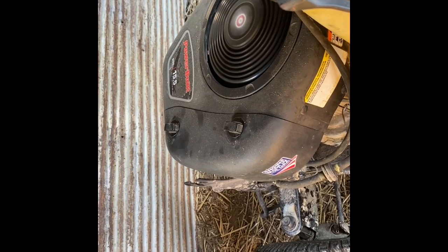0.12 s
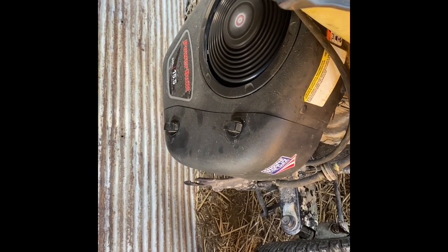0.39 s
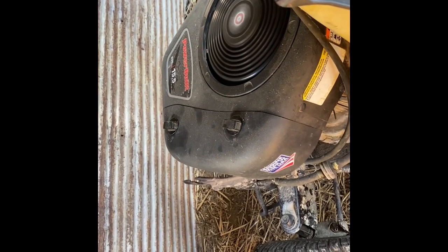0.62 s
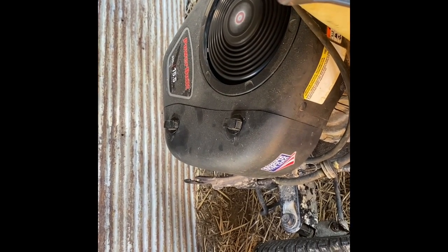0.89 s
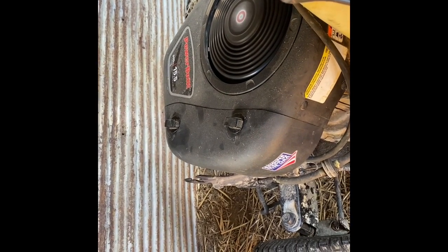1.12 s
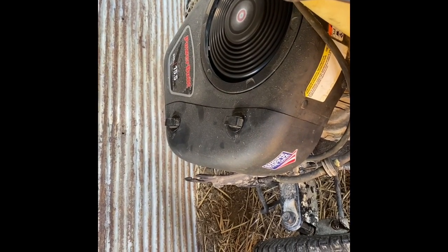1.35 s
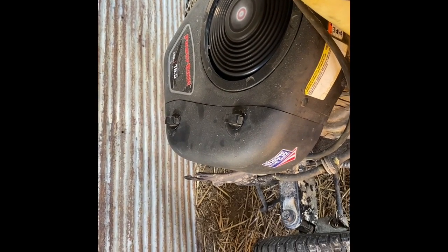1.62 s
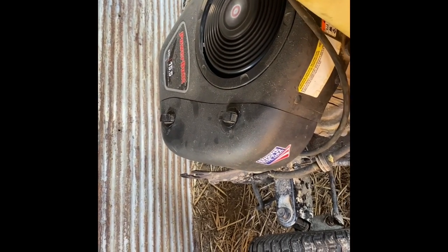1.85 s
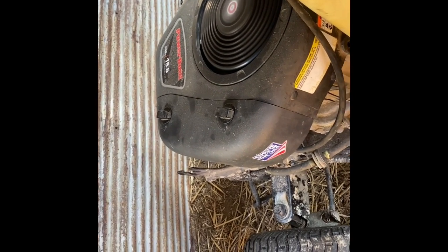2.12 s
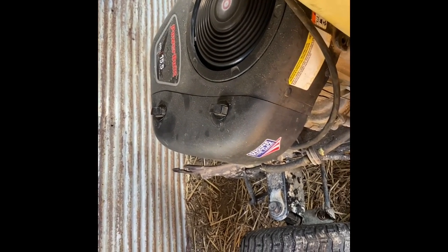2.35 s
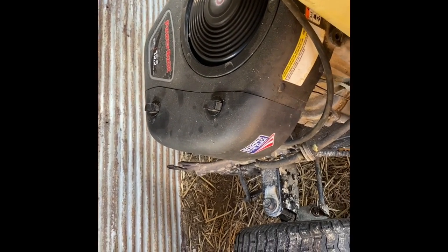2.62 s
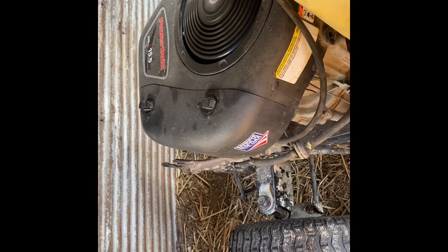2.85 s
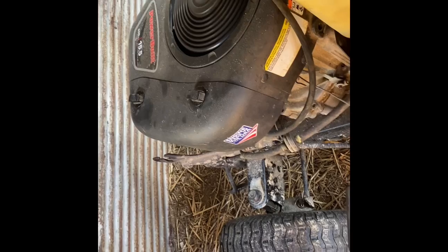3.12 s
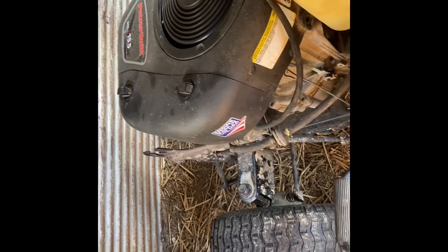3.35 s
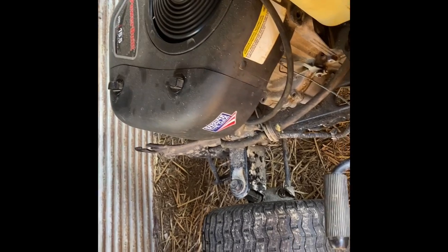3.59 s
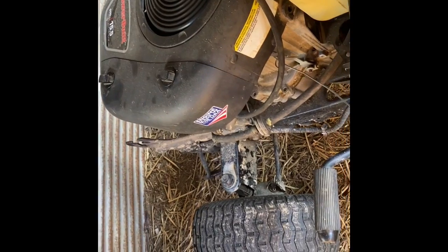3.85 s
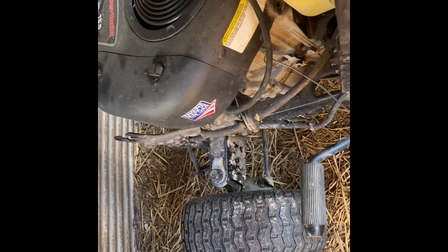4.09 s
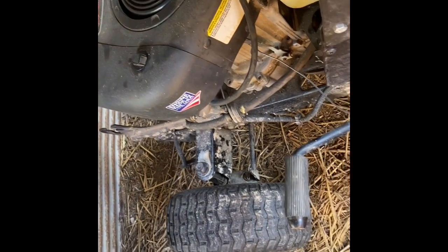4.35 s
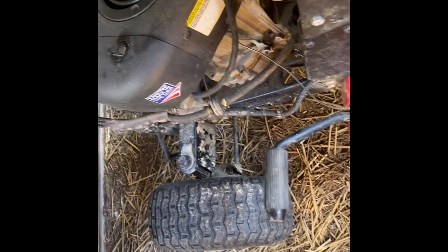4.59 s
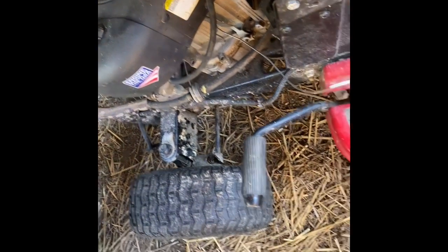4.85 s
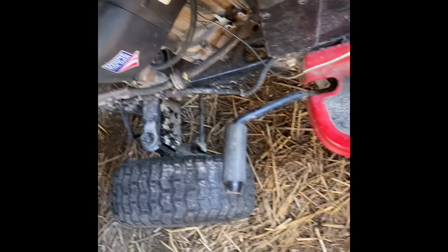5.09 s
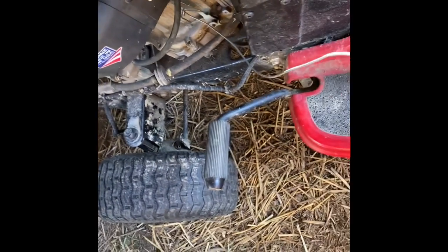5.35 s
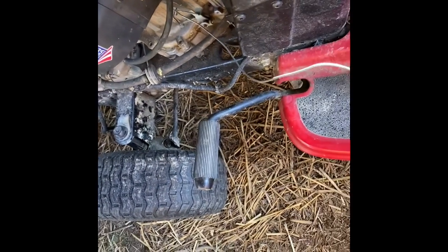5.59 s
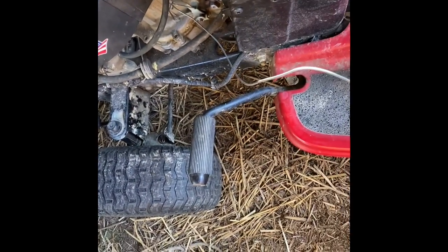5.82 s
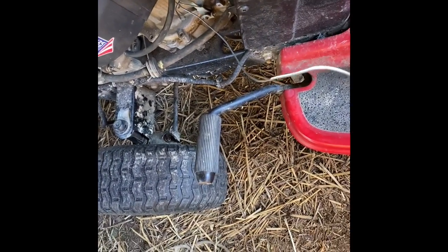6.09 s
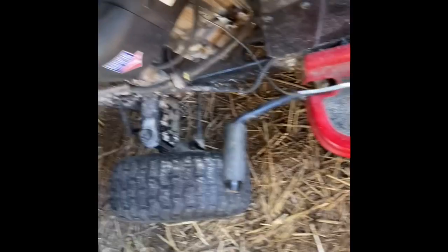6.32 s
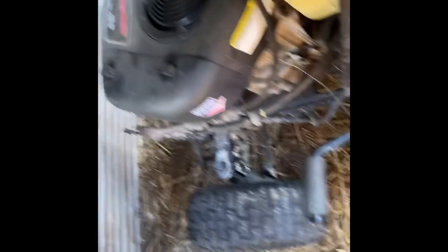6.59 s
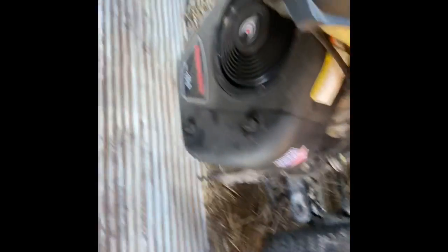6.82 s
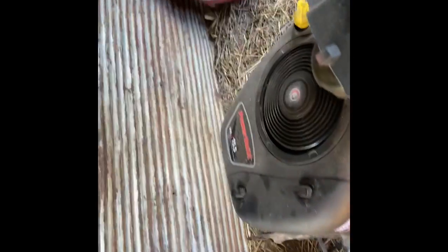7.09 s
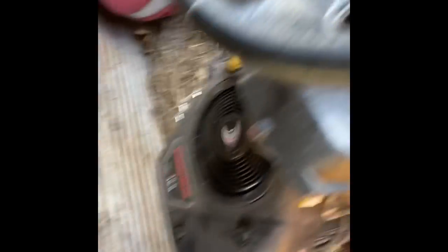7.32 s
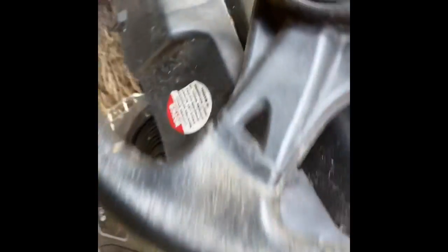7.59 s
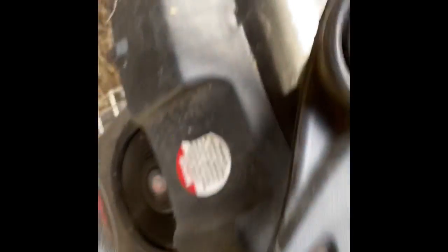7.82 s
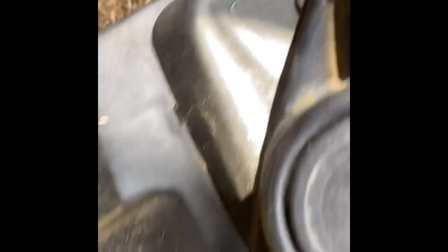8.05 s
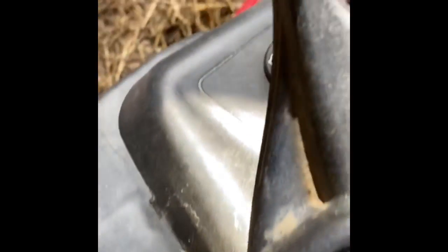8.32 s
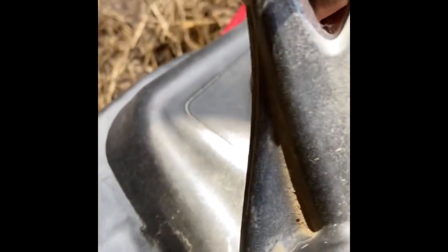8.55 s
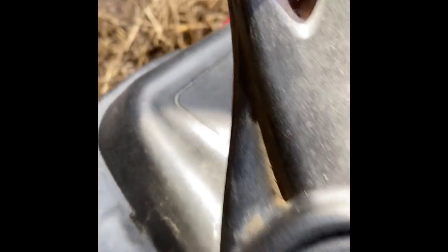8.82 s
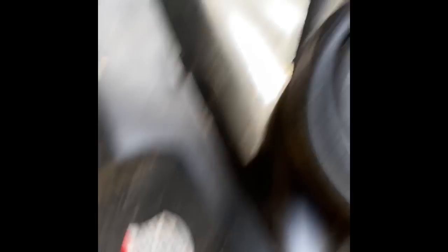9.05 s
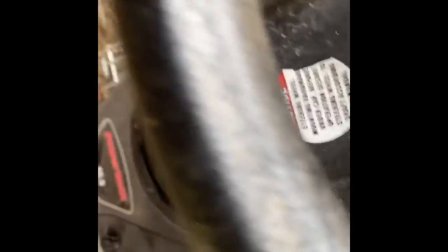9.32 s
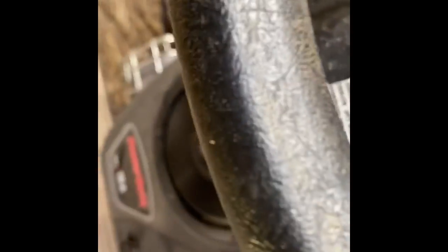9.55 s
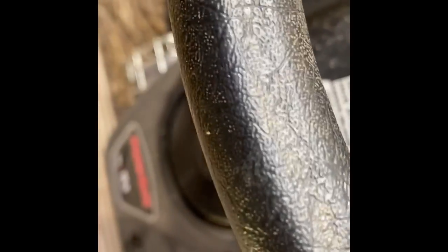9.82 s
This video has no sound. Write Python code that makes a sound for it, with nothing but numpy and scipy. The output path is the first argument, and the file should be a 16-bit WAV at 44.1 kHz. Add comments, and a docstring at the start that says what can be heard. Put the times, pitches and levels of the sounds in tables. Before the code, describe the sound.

Close up outdoors, a riding mower's petrol engine buzzes at speed, drops to a thudding, ticking idle, and finally cuts out with cracks and knocks.

```python
"""Beside a sheet-metal wall, a hand-held phone with two ports moves around a lawn tractor.
Its single-cylinder four-stroke engine runs fast, is throttled down to idle and switched off.
Each cycle rings pipe and muffler with a low thud and a sharp bang; two valve strokes tick and puff.
The casing rattles, the valve gear taps and the cooling fan rushes, all from filtered pulses and noise.
Under load, tones on the cycle rate drone; at the stop, cracks and a loose part's knocks are heard."""
import sys
import numpy as np
from scipy import signal
from scipy.fft import rfft, irfft, next_fast_len
from scipy.io import wavfile
from scipy.ndimage import uniform_filter1d

SR = 44100
rng = np.random.default_rng(int(sys.argv[2]) if len(sys.argv) > 2 else 0)


def boost(x):
    """Linear amplitude factor 10**(x/20) for a level x in decibels (scalar or array-like)."""
    u = np.asarray(x, float) / 20
    return 10 ** u


def generate_wav(sig):
    """Save sig (samples, or channels by samples) to the path in sys.argv[1] as 16-bit PCM at SR."""
    pcm = np.round(np.clip(np.atleast_2d(sig).T, -1, 1) * 32767).astype(np.int16)
    wavfile.write(sys.argv[1], SR, pcm)


N = 437913
T = np.arange(N) / SR  # time in s
FFT_SIZE = next_fast_len(N)
HZ = np.maximum(np.arange(FFT_SIZE // 2 + 1) * SR / FFT_SIZE, 1)  # frequency of each filter bin
MAX_CYCLES = 400  # more than the engine makes
IDLE_RATE = 14  # cycles per s
IGNITION_OFF_S = 9.185


def level(x, db):
    """Scale to an rms level."""
    return x * boost(db) / np.sqrt(np.mean(x ** 2))


def even(x):
    """Hold the power at 1 over a few cycles, whatever the speed."""
    power = uniform_filter1d(uniform_filter1d(x ** 2, size=8000), size=8000)
    return x / np.sqrt(power + 1e-12)


def follow(table):
    """Draw a two-column table out over time."""
    return np.interp(T, *np.transpose(table))


def shape(x, gain):
    """Filter by a complex gain given on HZ."""
    return irfft(rfft(x, FFT_SIZE) * gain, FFT_SIZE)[..., :N]


def ring(hz, width):
    """Response of one resonance, gain 1 at its centre."""
    return 1 / (1 + 1j * (HZ - hz ** 2 / HZ) / width)


def late(ms):
    """A pure delay."""
    return np.exp(-2j * np.pi * HZ * ms / 1000)


def colour(points):
    """Gain through (Hz, dB) points, straight on a log pitch scale."""
    hz, db = np.transpose(points)
    return boost(np.interp(np.log(HZ), np.log(hz), db, left=-60, right=db[-1] - 1.0))


def modes(push, table, column=0):
    """Ring delayed modes with the gains of one column, the sum darkened above 560 Hz."""
    gain = sum(row[3 + column] * late(row[2]) * ring(row[0], row[1]) for row in table)
    return shape(push, gain / (1 + (HZ / 560) ** 4))


def pulses(cycle, at, sizes):
    """One click each time the cycle passes the share `at`, split between two samples."""
    turn = np.arange(np.ceil(cycle[0] - at), cycle[-1] - at)
    place = np.interp(turn + at, cycle, np.arange(N - 0.))
    i, out = place.astype(int), np.zeros(N + 1)
    out[i] += sizes[:len(i)] * (1 - place + i)
    out[i + 1] += sizes[:len(i)] * (place - i)
    return out[:N]


def walk(rate):
    """Random levels held 1 / rate s and slewed twice."""
    hold = int(SR / rate)
    steps = np.repeat(rng.standard_normal(N // 200), hold)[:N]
    return uniform_filter1d(uniform_filter1d(steps, hold), hold)


def steadied(draws):
    """Per-cycle chance, bounded, and narrower over the cycles at working speed."""
    return np.clip(draws, -2, 2) * np.interp(np.arange(MAX_CYCLES), [46, 64], [.4, 1])


# engine speed, one cycle every two shaft turns: start_s, rate [cycles per s]
SPEED = [(0.0, 21.99), (0.43, 24.129), (0.65, 24.606), (1.22, 23.811), (1.86, 24.186), (2.14, 21.513),
         (2.3, 20.813), (2.96, 16.428), (3.9, 14.546), (4.9, 13.87), (5.42, 14.007), (5.76, 13.55),
         (6.15, 14.136), (6.6, 13.845), (8.45, 14.149), (9.1, 13.73), (9.93, 6.459)]


def engine_cycle():
    """Count the engine's cycles by summing its speed."""
    return -.04 + np.cumsum(follow(SPEED)) / SR


def pace(cycle):
    """Speed as a multiple of idle."""
    return np.gradient(cycle) * SR / IDLE_RATE


def load(cycle):
    """0 at idle or with the throttle shut, 1 under power at working speed."""
    shut_s, travel_s = 2.016, 0.13
    throttle = np.clip((shut_s - T) / travel_s + .5, 0, 1)
    return np.clip((pace(cycle) - 1.1) / .55, 0, 1) * throttle


# the phone moves nearer and further: start_s, level_db [on thud, bang, casing, blowdown and gas]
NEARNESS = [(0, 1.5), (0.6, 1.5), (1.3, 0), (2.2, 0.1), (2.6, -1.5), (3.0, -2), (3.5, 0.5), (4.2, -0.43),
            (6.5, 1.5), (7.5, 1.55), (9.1, 2.5)]


def loudness(cycle, law):
    """A layer's level in dB from speed, spark and the phone's distance."""
    idle_db, powered_db, step_db, coasting_db = law
    spark_fade_s = 0.11
    off = np.clip((T - IGNITION_OFF_S) / spark_fade_s + .5, 0, 1)
    doublings = np.log2(pace(cycle))
    powered = (1 - off) * powered_db * doublings
    coasting = off * (step_db + coasting_db * doublings)
    return idle_db + powered + coasting + follow(NEARNESS)


# the phone turns towards and away from the exhaust outlet: start_s, level_db [on the bang]
FACING = [(0, -5.5), (0.5, -3.5), (1.9, -0.9), (2.3, 2), (2.66, 1.5), (2.85, 0.2), (4.5, 0.5), (5.5, 0.4),
          (7.0, 1), (7.25, 1.85), (9.0, 2.1)]
# how thud and bang follow the engine: idle_db [relative], powered_db [per doubling of speed],
# step_db [as the spark stops], coasting_db [per doubling of speed]
THUD_LAW = (-21, 1.5, -1, 5)
BANG_LAW = (-23.5, 3, -2, 21)


def exhaust_levels(cycle):
    """The bang follows the way the phone faces; the low thud follows it only slightly."""
    facing_db = follow(FACING)
    thud_db = loudness(cycle, THUD_LAW) + 0.098 * facing_db
    bang_db = loudness(cycle, BANG_LAW) + facing_db
    return thud_db, bang_db, facing_db


# which exhaust voice holds: start_s, voice [0 at speed, 1 idle beside the engine, 2 idle behind it]
VOICE = [(0, 0.022), (2.05, 0.11), (2.35, 1.35), (6.4, 1.03), (7.1, 1.36), (7.25, 1.78), (8.1, 1.85),
         (9.13, 2.5), (9.25, 0.98)]


def exhaust_voice():
    """Shares of the idling voice, and of the phone's place behind the engine."""
    voice = follow(VOICE)
    return np.clip(voice, 0, 1), np.clip(voice - 1, 0, 1)


# burns that stumble as the throttle closes or come weak at idle: start_s, thud_db, bang_db
STUMBLES = [(2.06, 5, 3.5), (2.33, 5.5, 0), (2.385, 5.5, 4), (2.487, 2, 5), (2.599, -3, -12.5),
            (2.643, 1, 3.5), (2.7, -9.5, -9.5), (3.69, -3, -3), (4.245, -3.5, -2), (4.455, -3, -1),
            (4.955, -6.5, -4.5), (7.11, -2.5, -4.5), (8.535, -2, -4.5)]


def burns(cycle, chance):
    """Pulses for each burn: the slug of gas, the bang, and the bang with further scatter."""
    # burns are even under load and uneven once the throttle closes
    ragged = np.interp(np.arange(MAX_CYCLES), [46, 50, 60, 64], [.3, 1, 1, 1])
    stumble_db = np.zeros((2, MAX_CYCLES))
    for start_s, *dbs in STUMBLES:
        stumble_db[:, round(np.interp(start_s, T, cycle))] = dbs
    slug = pulses(cycle, 0, boost(ragged * 1.08 * chance[0] + stumble_db[0]))
    # now and then a weak burn
    burn_db = ragged * (.8 - 1.6 * abs(chance[1]) + 1.2 * chance[0]) + stumble_db[1]
    burn = pulses(cycle, 0, boost(burn_db))
    scattered = pulses(cycle, 0, boost(burn_db + ragged * 1.2 * chance[2]))
    return slug, burn, scattered


# pipe and muffler modes, hot and under load: pitch_hz, width_hz, arrival_ms, gain [signed, relative]
FAST_PIPE = [(42, 3.1, 4.3, 5), (85.5, 19, 11, -8), (135.8, 23.6, 10.12, 14.5), (156, 23, 1.9, 4.5),
             (178, 53, 5.33, -3)]
FAST_MUFFLER = [(224, 120, 1.9, -5), (277, 12.3, 2.34, 22), (313, 72, 6.7, 19), (340, 28, 1.1, -5),
                (403, 18, 3.8, 8), (441, 180, 4.1, 21), (490, 58, 8.4, 17)]
# pipe modes and muffler shell modes at idle, the last three of the muffler a return of the bang:
# pitch_hz, width_hz, arrival_ms, beside_gain, behind_gain [signed, relative]
PIPE = [(47.3, 10, 8.9, -30, -24), (79.8, 24, 13.3, -53, -100), (131.6, 27, 11.4, -88, -128),
        (158, 41, 2.5, -233, -193), (164.5, 66, 5.5, -157, -139)]
MUFFLER = [(202, 320, 1.6, 66, -17), (276, 16.4, 2.4, -21, -129), (330.5, 50, 6.9, 40, 119),
           (346, 48, 2.8, 40, 170), (346.5, 404, 1.8, -76, -12), (412, 7, 2.8, 12, -82),
           (417, 145, 4.1, 73, 75), (469, 81, 3.4, 63, 57), (305, 85, 16.1, -14, -14),
           (275, 79, 17.3, -13, 9), (423, 91, 24.6, 4, 13)]


def exhaust(cycle):
    """Burns ring pipe and muffler; spark off, soft thuds return, the shell rings late, the intake gulps."""
    thud_db, bang_db, facing_db = exhaust_levels(cycle)
    idling, behind = exhaust_voice()
    chance = rng.standard_normal((3, MAX_CYCLES))
    slug, burn, scattered = burns(cycle, chance)

    fast_thud = boost(thud_db + 1.8) * even(modes(slug, FAST_PIPE))
    fast_bang = boost(bang_db - 3.0) * even(modes(burn, FAST_MUFFLER))
    fast = fast_thud + fast_bang * (1 - .9 * load(cycle))  # most of the bang melts into the drone

    # the higher muffler modes answer each burn with their own strength
    split_hz = 360
    low = [m for m in MUFFLER if m[0] < split_hz]
    high = [m for m in MUFFLER if m[0] >= split_hz]
    idle = 0
    for column, share in enumerate([1 - behind, behind]):
        bang = modes(burn * share, low, column) + modes(scattered * share, high, column)
        idle = idle + modes(slug * share, PIPE, column) + boost(facing_db) * bang
    firing = np.sqrt(idling) * boost(thud_db + 0.5) * even(idle) + np.sqrt(1 - idling) * fast

    returns = late(5.5) + 0.45 * late(32) + 0.2 * late(58)
    air = shape(-slug, returns * ring(88, 66) * ring(70, 110) / (1 + (HZ / 190) ** 4))
    # the intake gulps between thuds
    gulp = pulses(cycle, .55, boost(-28 + 3.0 * chance[2]))
    air = air + shape(gulp, ring(68, 60) * ring(60, 90))
    shell_gain = late(22.4) * ring(269, 12) + 0.33 * late(22) * ring(363, 160)
    shell = shape(burn, shell_gain / (1 + (HZ / 500) ** 4))
    coasting = boost(thud_db - 0.3) * even(air) + boost(bang_db + 1.5) * even(shell)

    shaft = boost(-37.5) * pace(cycle) ** 1.8 * np.sin(4 * np.pi * cycle)  # one shake every turn
    return np.where(T > IGNITION_OFF_S, coasting, firing) + shaft


# steady tones of the frame and cowl shaking under load: multiple [of the cycle rate], level_db [relative]
DRONE = [(7, -15), (8, -8), (9, -15), (10, -15), (11, -12), (12, -9), (13, -6), (14, -13), (15, -18),
         (16, -15), (17, -12), (18, -7), (19, -18), (20, -8), (21, -13), (24, -10), (25, -18), (27, -13),
         (28, -17), (29, -17), (30, -14), (31, -15), (32, -7), (34, -11), (35, -16), (40, -14), (41, -13),
         (42, -18)]


def drone(cycle):
    """Wavering tones on the cycle rate, above the exhaust thud; they stop quickly as the throttle shuts."""
    tones = 0
    for multiple, db in DRONE:
        turns = multiple * cycle + rng.random() + 0.06 * walk(20)
        tones = tones + boost(db + 1.2 * walk(6)) * np.sin(2 * np.pi * turns)
    bang_db = exhaust_levels(cycle)[1]
    return boost(bang_db + 2.5) * level(tones, 0) * load(cycle)


# valve strokes: at [share of the cycle after firing], level_db [relative], rise, fade [shares of a cycle]
VALVES = [(.26, -6.5, 0.015, 0.18), (.57, -2, 0.03, 0.093)]


def strokes(cycle):
    """Gas flow over the cycle: a quick rise and slower fade at each valve stroke, a new size each time."""
    flow = 0
    for at, db, rise, fade in VALVES:
        since = cycle - at + 2
        size = boost(db + 3.2 * rng.standard_normal(MAX_CYCLES))[since.astype(int)]
        flow = flow + size * (1 - np.exp(-(since % 1) / rise)) * np.exp(-(since % 1) / fade)
    return flow


# colour of the long puff: pitch_hz, level_db [relative]
BLOW = [(1700, 6.5), (2100, 10.5), (3000, 2), (5200, -0.5), (6800, 1), (9000, -4.5)]
# how the puff follows the engine: idle_db [relative], powered_db [per doubling of speed],
# step_db [as the spark stops], coasting_db [per doubling of speed]
BLOW_LAW = (-43, 0.5, 6, 5.5)


def blowdown(cycle, flow):
    """Gas leaves the cylinder in one long puff after each firing, and again at the valve strokes."""
    speed = pace(cycle)
    size = boost(1.5 * rng.standard_normal(MAX_CYCLES))[(cycle + 1).astype(int)]
    phase = 2 * np.pi * (cycle - 0.24 * np.minimum(speed, 1))
    puff = size * np.exp(2.0 / speed * (np.cos(phase) - 1)) + 0.36 * flow
    noise = rng.standard_normal((2, N)) * (0.087 * speed + puff)
    return boost(loudness(cycle, BLOW_LAW) + 3.5) * level(shape(noise, colour(BLOW)), 0)


# colour of the gas hiss: pitch_hz, level_db [relative]
GAS = [(5000, -10), (7500, 7.5), (9400, 2), (12000, -0.5), (15500, -2.5)]
# how the hiss follows the engine: idle_db [relative], powered_db [per doubling of speed],
# step_db [as the spark stops], coasting_db [per doubling of speed]
GAS_LAW = (-45, 7, -1, 16)


def gas_hiss(cycle, flow):
    """Bright noise, steady in part and swelling with the gas flow of the valve strokes."""
    noise = rng.standard_normal((2, N)) * (0.13 * pace(cycle) + flow)
    return boost(loudness(cycle, GAS_LAW)) * level(shape(noise, colour(GAS)), 5.95)


# colour of fan and intake: pitch_hz, level_db [relative]
RUSH = [(120, 1.5), (200, -6), (250, -10.5), (320, -6.5), (450, -6), (600, -11), (1200, -14), (2200, -21),
        (3200, -27), (5500, -30), (8000, -38.5)]


def fan_rush(cycle):
    """Cooling fan and intake: wavering coloured noise, thinner in the bass under load."""
    noise = rng.standard_normal((2, N)) * boost(1.07 * walk(12))
    rush = level(shape(noise, colour(RUSH)), 0.41)
    rush = rush - load(cycle) * shape(rush, 1 / (1 + (HZ / 600) ** 2))
    return rush * (1 + 0.11 * np.cos(2 * np.pi * (cycle - .25)))  # the intake draws once a cycle


def clatter(cycle):
    """The same parts strike in the same order each cycle, more faithfully at speed; the rest is new."""
    slots = 2048  # steps in one cycle
    pattern = rng.standard_normal((2, slots))
    same = np.clip(.45 * (pace(cycle) - .4), 0, .6)
    place = (cycle % 1 * slots).astype(int) % slots
    return same * pattern[..., place] + np.sqrt(1 - same ** 2) * rng.standard_normal((2, N))


# casing modes: pitch_hz, width_hz, level_db [relative]
CASING = [(273.2, 8.7, 6), (334.5, 11.2, 5.5), (586, 10, 2.5), (728.4, 52, 4.5), (1004, 100, 1),
          (1280, 345, -6.5), (2035, 85, -10.5), (2670, 170, -20), (3240, 97, -45), (4770, 460, -26.5)]


def casing(cycle):
    """Firing and valve ticks and a steady rattle ring the metal casing; the ticks hit harder at speed."""
    ticks = 0
    for at, db in [(0, -3), (.75, 0)] + [valve[:2] for valve in VALVES]:
        ticks = ticks + pulses(cycle, at, boost(db + 3.5 * rng.standard_normal(MAX_CYCLES)))
    ticks = ticks * pace(cycle) ** 0.43
    swell = 1 + 0.21 * np.cos(2 * np.pi * (cycle - .2))
    rattle = swell * boost(1.7 * walk(25)) * clatter(cycle)
    # neighbouring modes ring in opposite sign
    body = sum((-1) ** k * boost(db) * ring(hz, width) for k, (hz, width, db) in enumerate(CASING))
    return level(shape(level(ticks, -6.0) + rattle, body), 0)


# taps of the valve gear: at [share of the cycle after firing], level_db [relative]
TAPS = [(.02, -9), (0.301, -10.5), (.45, -2.5), (.62, -13), (.8, -7)]
# what the taps ring: pitch_hz, width_hz, level_db [relative]
ROCKERS = [(754, 110, 2), (985, 21, 8), (1565, 55, 5.5), (2030, 44, 5), (2325, 11, 10), (2500, 29, 0),
           (3240, 36, -12), (4800, 36, -13), (5200, 110, -17)]


def tappets(cycle):
    """Rockers tap a little early or late; every tap rings the modes in a new balance."""
    slop, scatter_db = 0.0199, 7.5  # slop scales the timing walk, in shares of a cycle
    loose = np.maximum.accumulate(cycle + slop * walk(30))
    chance = steadied(rng.standard_normal((len(ROCKERS), len(TAPS), MAX_CYCLES)))
    out = 0
    for (hz, width, mode_db), draws in zip(ROCKERS, chance):
        push = sum(pulses(loose, at, boost(db + scatter_db * d)) for (at, db), d in zip(TAPS, draws))
        out = out + shape(push, boost(mode_db) * ring(hz, width))
    return level(out, -16.5)


# clack of the valve gear after each firing: pitch_hz, width_hz, level_db [relative],
# at [share of the cycle], fade_ms
CLACK = [(970, 86, -6.5, .4, 7), (1512, 170, -16.5, .25, 7.3), (2070, 220, -11.5, .2, 26),
         (2558, 190, -12.5, .25, 22), (3245, 170, -21.5, .24, 5.3), (5140, 470, -18, .3, 10.6)]


def clack(cycle):
    """Short rattling bursts, sharp in attack, each mode with a new strength every cycle."""
    out = 0
    for hz, width, db, at, fade_ms in CLACK:
        since = cycle - at + 2
        size = boost(4.5 * steadied(rng.standard_normal(MAX_CYCLES)))[since.astype(int)]
        fade = pace(cycle) * IDLE_RATE * fade_ms / 1000  # as a share of the cycle
        burst = size * np.exp(-(since % 1) / fade) * rng.standard_normal((2, N))
        out = out + level(shape(burst, ring(hz, width) ** 2), db - 7.5)
    return out


# how the metal and fan follow the engine: idle_db [relative], powered_db [per doubling of speed],
# step_db [as the spark stops], coasting_db [per doubling of speed]
CASING_LAW = (-29.5, 12.5, -0.5, 7)
# what the cowl adds or shades once the phone is behind the engine: pitch_hz, width_hz, share [signed]
COWL = [(692, 47, 0.6), (867, 105, 1), (1240, 720, -0.49)]


def metalwork(cycle):
    """Fan, casing and valve gear share one level law; the cowl recolours them behind the engine."""
    parts = fan_rush(cycle) + boost(-4.0) * casing(cycle) + tappets(cycle) + clack(cycle)
    metal = boost(loudness(cycle, CASING_LAW)) * parts
    _, behind = exhaust_voice()
    return metal + behind * shape(metal, sum(share * ring(hz, width) for hz, width, share in COWL))


# the exhaust valve snaps open on unburnt charge as the engine runs down: start_s, level_db [relative]
SNAPS = [(9.1965, -14), (9.2758, -18), (9.3586, -15.5), (9.4529, -16.5), (9.5512, -18.5), (9.6444, -24),
         (9.7827, -24)]


def snaps():
    """A sharp broad crack of fading noise that dies in the casing."""
    out, since_ms = np.zeros((2, N)), np.arange(1500) * 1000 / SR
    fade_ms = 6.4
    for start_s, db in SNAPS:
        i = int(start_s * SR)
        out[:, i:i + 1500] = boost(db) * rng.standard_normal((2, 1500)) * np.exp(-since_ms / fade_ms)
    return 2.1 * shape(out, ring(1400, 300) + 0.43 * ring(2050, 600) + 0.2 * ring(4300, 3000))


# loose part knocking as the engine rocks to rest: start_s, level_db [relative]
KNOCKS = [(9.254, -15), (9.336, -15), (9.425, -20), (9.467, -16), (9.521, -15.5), (9.621, -15),
          (9.668, -22), (9.742, -14.5), (9.798, -12), (9.879, -16)]


def knocks():
    """Each knock is a short noise burst that rings two modes of the loose part."""
    out = np.zeros(N)
    for start_s, db in KNOCKS:
        i = int(start_s * SR)
        out[i:i + 500] = boost(db) * rng.standard_normal(500) * np.exp(-np.arange(500) / 200)
    return 7 * shape(out, ring(810, 80) + 0.13 * ring(1180, 92))


# stereo phase by pitch, held flat near some half turns where mid or side is all but empty:
# pitch_hz, phase [radians between left and right], likeness [0-1]
STEREO_PHASE = [(60, .01, 1), (150, -.06, 1), (330, -.3, 1), (780, -.85, .4), (1300, -.38, .6),
                (2000, .6, .5), (2700, 1.6, .2), (4000, .8, .4), (5100, .65, .3), (6100, 1.5, .7),
                (6800, 3.1, .7), (7900, 3.18, .7), (9000, 5.1, .7), (9900, 6.24, .7), (11300, 6.33, .7),
                (12200, 7.9, .6), (12950, 9.4, .6), (14400, 9.45, .6), (15200, 11, .5), (16000, 12.2, .5)]
# small lean of the stereo picture by pitch: pitch_hz, level_db [added to left over right]
STEREO_LEAN = [(200, 0), (330, 1), (600, .5), (1200, 0), (2400, -2.2), (4400, -.6), (8000, 0)]


def stereo(pair):
    """Mid and side share the sound by a phase set for each pitch; the unlike share uses the second draw."""
    hz, phase, alike = np.transpose(STEREO_PHASE)
    phase, alike = np.interp(HZ, hz, phase), np.clip(np.interp(HZ, hz, alike), 0, 1)
    mid = shape(pair[0], np.cos(phase / 2))
    side = shape(pair[0], 1j * np.sin(phase / 2) * alike)
    side = side + shape(pair[1], np.sin(phase / 2) * np.sqrt(1 - alike ** 2))
    lean_hz, lean_db = np.transpose(STEREO_LEAN)
    lean = np.interp(np.log(HZ), np.log(lean_hz), lean_db)
    side = side + shape(mid, np.tanh(lean * np.log(10) / 40))
    return np.array([mid + side, mid - side])


def scene():
    """The engine's layers, the noisy ones mostly as two unrelated draws, spread into stereo."""
    cycle = engine_cycle()
    flow = strokes(cycle)
    engine = exhaust(cycle) + drone(cycle) + metalwork(cycle)
    hiss = blowdown(cycle, flow) + gas_hiss(cycle, flow)
    return stereo(engine + hiss + snaps() + knocks())


def band_limit(x):
    """A steep low-pass at the top of the band."""
    return signal.sosfilt(signal.butter(12, 17110, fs=SR, output="sos"), x)


def record(dry):
    """The phone cuts the deepest bass and the top."""
    bass_cut = signal.butter(4, 38, "highpass", fs=SR, output="sos")
    top_cut = signal.ellip(8, .2, 70, 15750, fs=SR, output="sos")
    mix = signal.sosfilt(top_cut, signal.sosfilt(bass_cut, dry))
    return band_limit(mix)


dry = scene()
out = record(dry)
generate_wav(out)
```